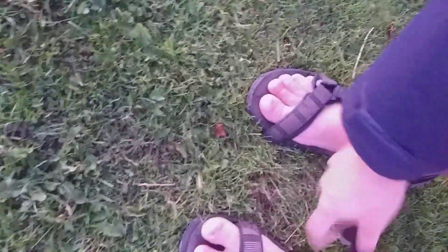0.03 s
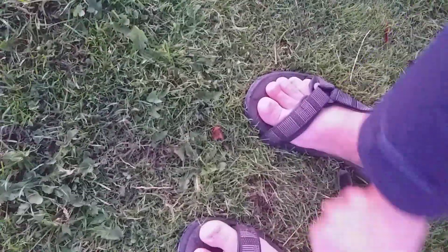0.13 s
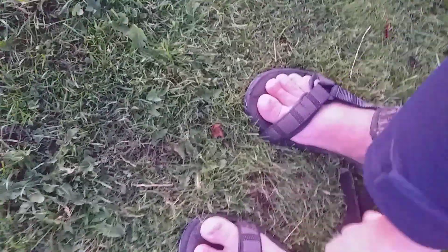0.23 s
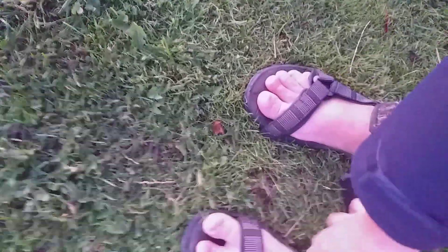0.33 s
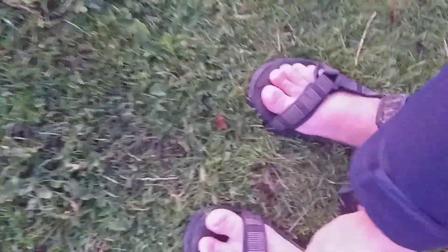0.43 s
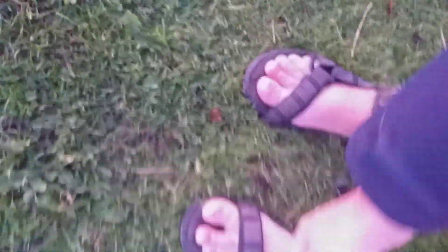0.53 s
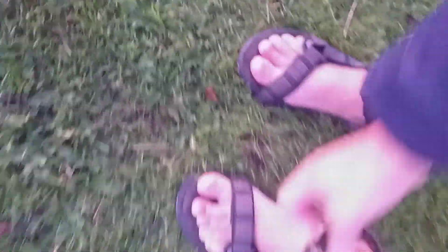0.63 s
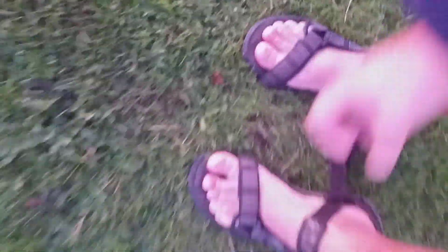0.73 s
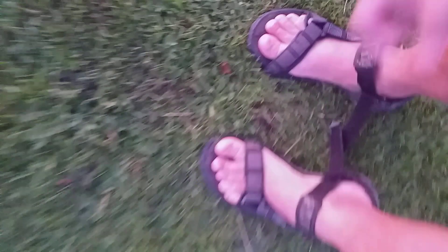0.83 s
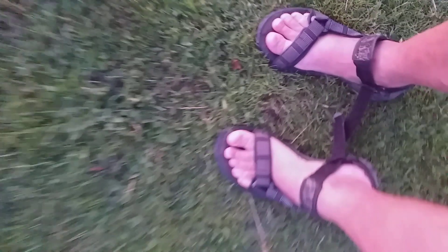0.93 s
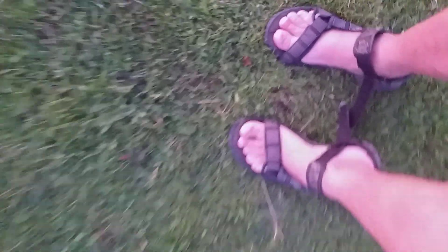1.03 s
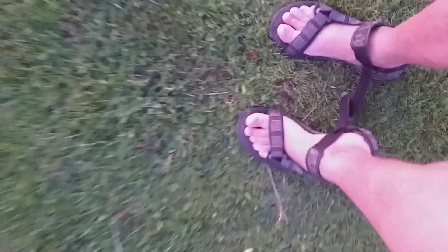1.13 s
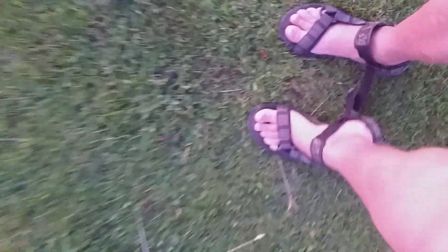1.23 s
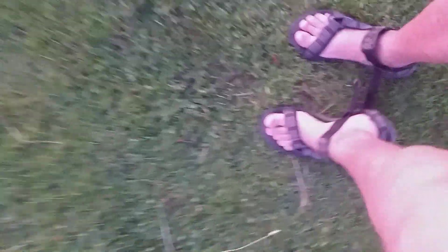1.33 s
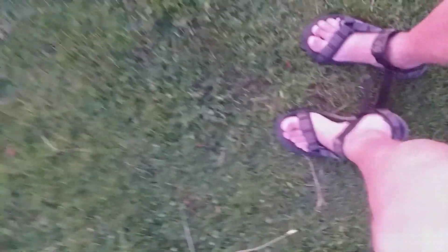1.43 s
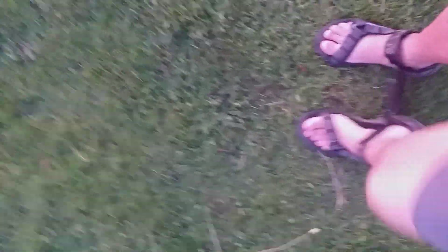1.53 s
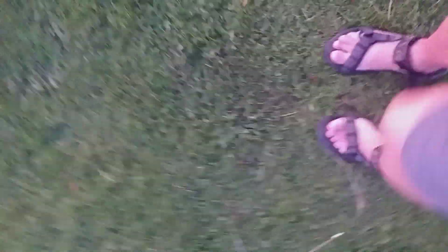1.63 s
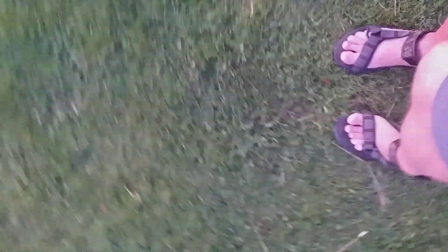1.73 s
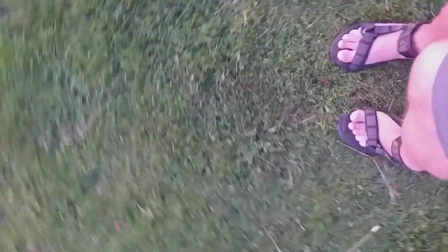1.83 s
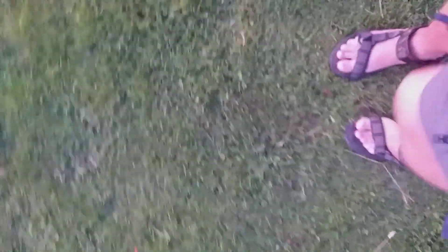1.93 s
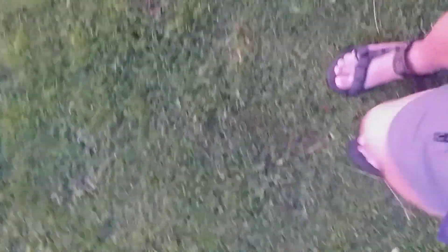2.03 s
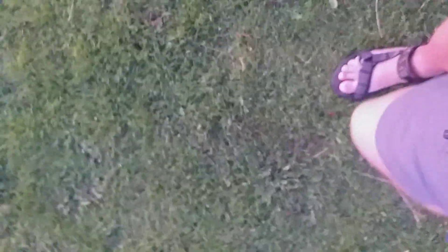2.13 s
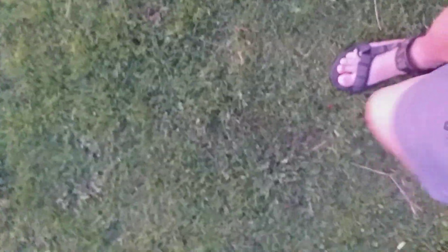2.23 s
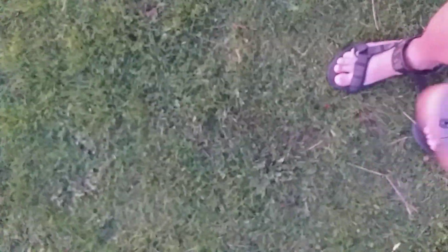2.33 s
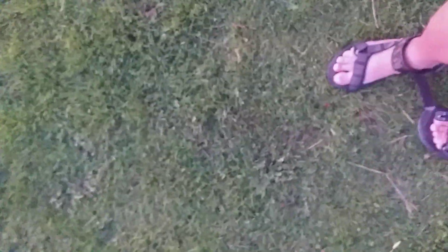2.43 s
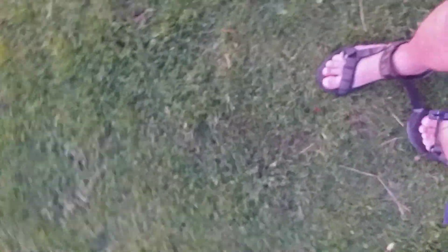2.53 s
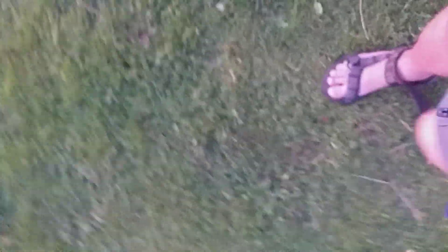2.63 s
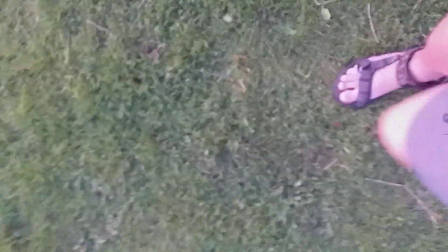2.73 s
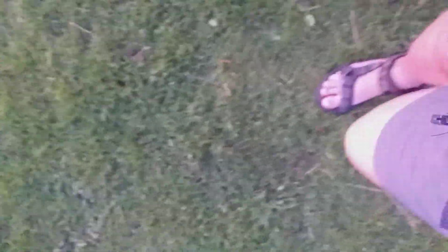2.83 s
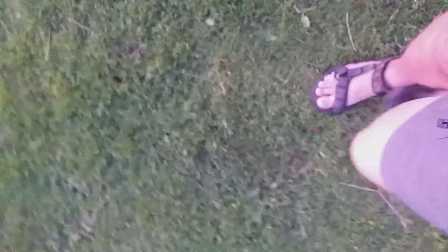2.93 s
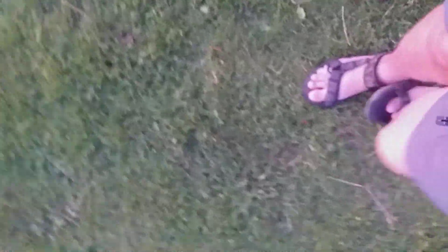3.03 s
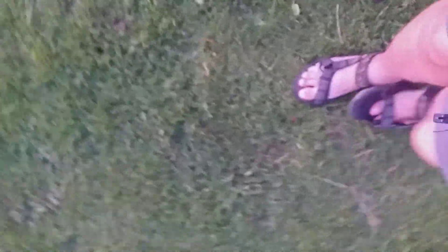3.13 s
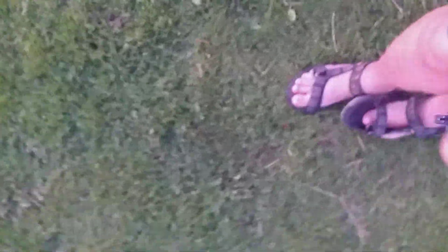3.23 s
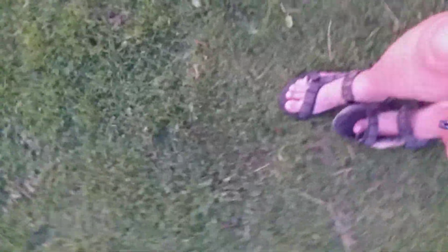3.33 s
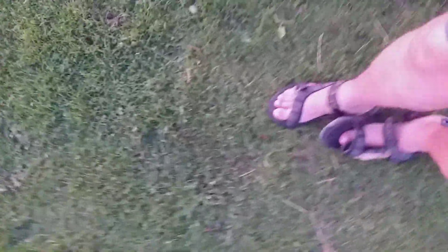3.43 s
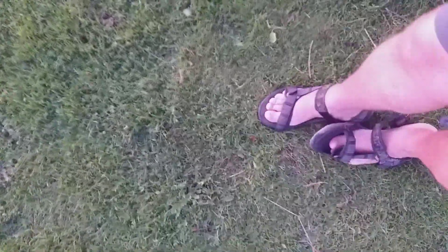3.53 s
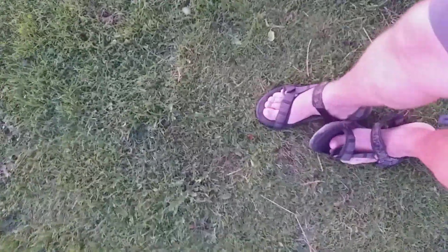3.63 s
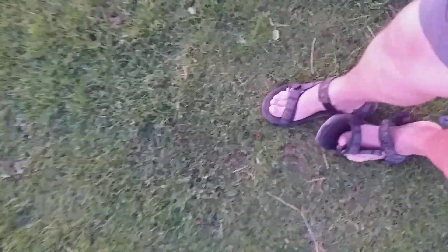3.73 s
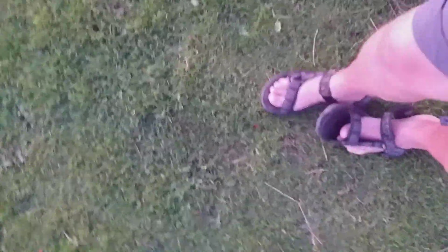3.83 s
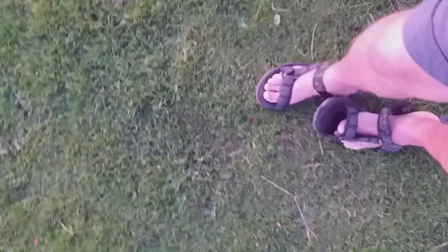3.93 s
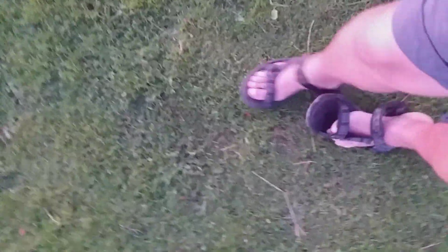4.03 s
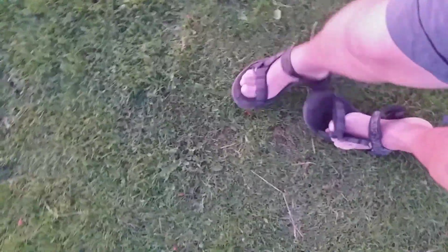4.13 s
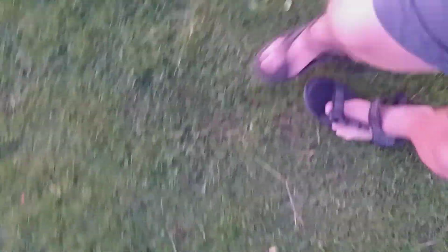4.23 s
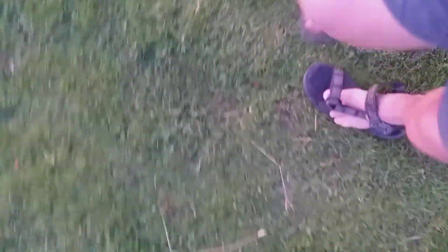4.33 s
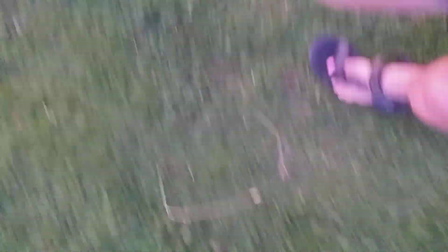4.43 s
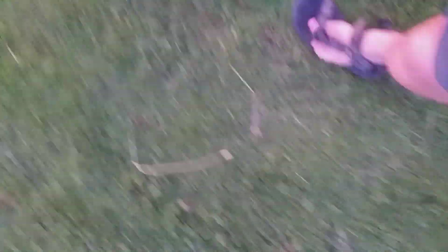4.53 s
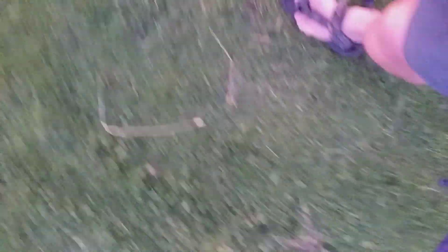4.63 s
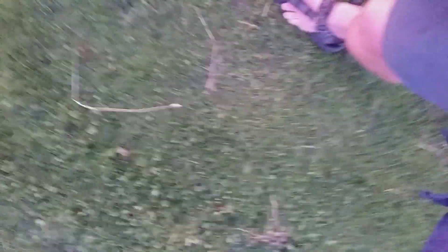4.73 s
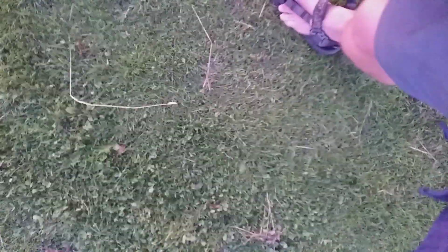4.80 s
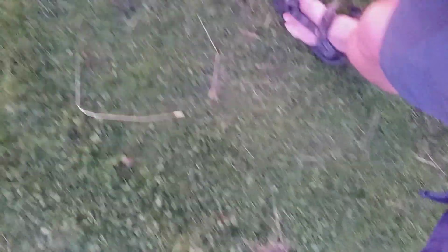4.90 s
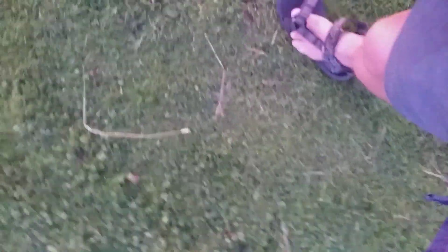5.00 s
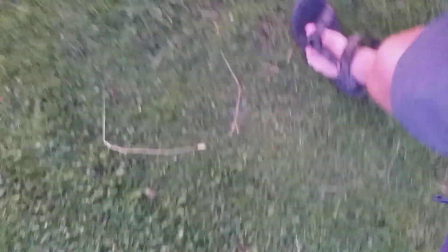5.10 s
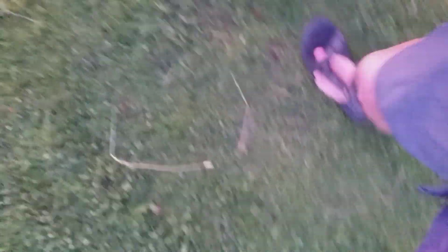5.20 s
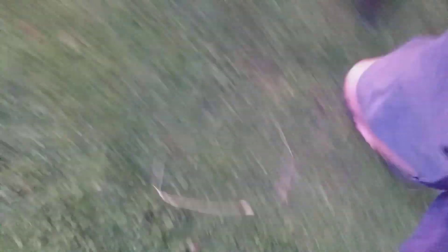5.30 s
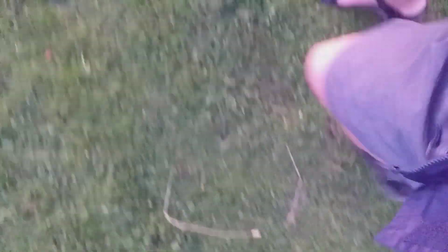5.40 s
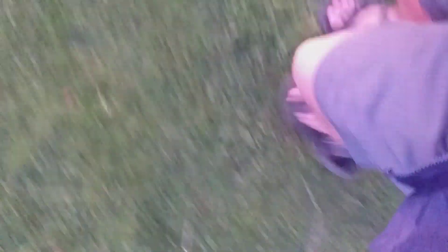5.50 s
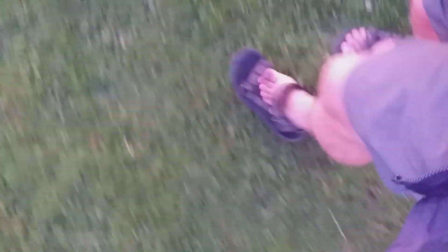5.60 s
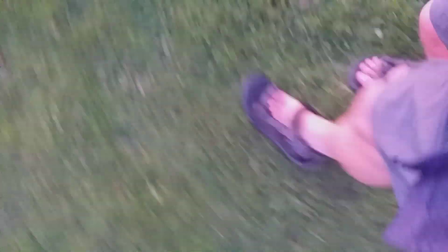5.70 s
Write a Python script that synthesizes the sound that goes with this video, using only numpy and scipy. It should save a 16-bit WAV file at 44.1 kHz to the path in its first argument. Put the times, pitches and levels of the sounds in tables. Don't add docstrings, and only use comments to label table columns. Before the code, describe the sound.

Low gusty wind rumble with fabric rubbing gives way to quiet sandal steps brushing grass, with dry clicks, scrapes and a strap snapping loose.

```python
import sys
import numpy as np
from scipy import signal
from scipy.fft import rfft, irfft
from scipy.io import wavfile
from scipy.ndimage import uniform_filter1d

SR = 44100
rng = np.random.default_rng(int(sys.argv[2]) if len(sys.argv) > 2 else 0)


def put_to_file(sound):
    columns = np.atleast_2d(sound).T
    safe = np.clip(columns, -1, 1)
    whole_steps = np.round(safe * 32767)
    wavfile.write(sys.argv[1], SR, whole_steps.astype(np.int16))


def natural_amplitude(level_db):
    exponent = np.asarray(level_db, float) / 20
    return 10 ** exponent


N = 254016

# [loudest at t/s, level/dB, rise/s per 10 dB, fall/s per 10 dB, weight/dB]
CLOTH = [
    (.02, -52, .1, .05, 8),
    (.08, -49, .08, .3, -8),
    (.3, -46.5, .25, .35, -6),
    (.66, -45.5, .3, .3, 0),
    (.86, -41.5, .25, .17, 1),
    (1.08, -44, .13, .25, -3),
    (1.31, -44.5, .2, .45, 2),
    (1.55, -50, .3, .2, 3),
    (1.81, -43, .15, .09, 1),
    (1.89, -48, .1, .03, 4),
]
# [loudest at t/s, level/dB, rise/s per 10 dB, fall/s per 10 dB, weight/dB]
SWISHES = [(2.04, -50, .1, .05, 1), (2.2, -57, .15, .2, -2), (2.36, -49.5, .1, .13, 0),
           (2.65, -56, .2, .2, 0), (2.78, -49, .15, .06, 0), (2.95, -53.5, .1, .15, -1),
           (3.16, -50.5, .16, .2, -1), (3.39, -54, .2, .15, 2), (3.71, -55.5, .12, .13, -1),
           (3.84, -60.5, .1, .15, -7), (4.13, -59, .15, .2, 3), (4.33, -41.5, .1, .23, 2),
           (4.5, -51.5, .2, .2, 0), (4.66, -52, .15, .05, 1), (4.77, -58, .1, .12, 3),
           (4.83, -55, .07, .06, -2), (4.94, -48, .03, .13, -4), (5.1, -49.5, .13, .12, -9),
           (5.21, -46, .15, .15, 3), (5.27, -49, .1, .05, -6), (5.37, -50.5, .15, .15, 2),
           (5.45, -51.5, .1, .1, -3), (5.6, -50, .08, .2, -3), (5.76, -48.5, .2, .2, 2)]


def unit(x):
    return x / np.sqrt(np.mean(x ** 2))


def band(x, lo_hz, hi_hz, order=2):
    return signal.sosfilt(signal.butter(order, [lo_hz, min(hi_hz, .45 * SR)], "band", fs=SR, output="sos"), x)


def steady(x, span):
    k = int(span * SR)
    power = uniform_filter1d(uniform_filter1d(x ** 2, k), k)
    return unit(x / np.sqrt(power + 1e-9))


def walk(rate):
    k = int(SR / rate)
    held = np.repeat(rng.standard_normal(N // k + 1), k)
    return unit(uniform_filter1d(held, k)[:N])


def grains(rate, spread_db):
    struck = rng.random(N) < rate / SR
    sign = np.sign(rng.standard_normal(N))
    size_db = spread_db * np.minimum(rng.exponential(size=N), 3)
    return unit(struck * sign * natural_amplitude(size_db))


def add(out, s, x):
    i = int(s * SR)
    out[i:i + len(x)] += x[:N - i]


def swells(rows, under_db):
    t, power = np.arange(0, N, 64) / SR, 0
    for s, db, rise, fall in rows:
        away = np.maximum((s - t) / rise, (t - s) / fall) ** 1.5
        power = power + natural_amplitude(2 * db - 20 * away)
    return 10 * np.log10(np.interp(np.arange(N) / SR, t, power) + natural_amplitude(2 * under_db))


def motion(table, offset_db, slope):
    return [(s, db + offset_db + slope * weight, rise, fall) for s, db, rise, fall, weight in table]


def ring(hz, cycles, fall):
    turn = np.arange(int(6 * cycles * SR / hz)) * hz / SR
    shape = turn / cycles * np.exp(-2 * turn / cycles)
    x = shape * np.sin(2 * np.pi * np.log1p(fall * turn) / fall)
    return x / np.abs(x).max()


def swirl(hz, cycles, lean):
    turn = np.arange(-2048, 2048) * hz / SR
    shape = np.exp(-np.log(16) * (turn / cycles) ** 2)
    return shape * np.cos(2 * np.pi * (turn - .06 * turn ** 2 / cycles) + lean)


def crack():
    burst = rng.standard_normal(128) * np.exp(-np.arange(128) / 18.0)
    burst[0] += 4.0 * np.sign(burst[0])
    return burst / np.sqrt(np.sum(burst ** 2))


def wind():
    # [t/s, strength/dB, bite of the small eddies/dB]
    gusts = [(0, -50, 0), (.09, -37, -1), (.42, -37, 0), (.55, -43, -4), (.68, -35, -1), (1.22, -36, 3),
             (1.3, -44, -6), (1.42, -46, -6), (1.48, -34, -8), (1.8, -36, -5), (1.94, -28, -2),
             (1.98, -45, -4), (2.07, -34, -7), (2.42, -47, -7), (2.47, -64, -5), (4.15, -59, -8),
             (4.3, -57, 0), (5.76, -60, -2)]
    # [strongest at t/s, peak level/dB, f/Hz, cycles at half height]
    thumps = [(0.065, -24.4, 182, 1.51), (0.085, -25.0, 110, 1.37), (0.128, -27.0, 118, 0.79),
              (0.154, -30.6, 147, 0.61), (0.165, -20.3, 145, 0.71), (0.184, -16.0, 129, 0.95),
              (0.202, -17.2, 96, 0.93), (0.226, -21.8, 89, 0.75), (0.253, -10.5, 171, 1.21),
              (0.279, -17.9, 139, 1.58), (0.319, -13.5, 200, 1.5), (0.331, -15, 115, 1.1),
              (0.37, -17.0, 117, 1.38), (0.402, -26.4, 143, 0.65), (0.438, -20.1, 128, 0.74),
              (0.65, -25.9, 128, 0.86), (0.686, -14.9, 120, 2.04), (0.703, -19.0, 147, 0.86),
              (0.723, -19.0, 174, 0.89), (0.778, -18.2, 121, 0.96), (0.811, -25.2, 116, 1.86),
              (0.836, -13.2, 203, 0.99), (0.879, -19.2, 125, 1.61), (0.908, -14.3, 124, 1.18),
              (0.926, -21.0, 106, 1.02), (0.966, -25.7, 89, 1.44), (0.981, -23.5, 140, 0.71),
              (0.997, -25.2, 122, 0.79), (1.019, -22.8, 127, 1.38), (1.066, -20.7, 172, 1.32),
              (1.077, -23.3, 111, 0.6), (1.121, -26.4, 139, 1.01), (1.134, -18.3, 149, 1.44),
              (1.189, -22.8, 180, 2.87), (1.214, -23.4, 197, 0.94), (1.474, -28.5, 112, 0.92),
              (1.508, -26.5, 110, 1.82), (1.612, -28.4, 113, 2.18), (1.653, -24.9, 110, 1.72),
              (1.783, -27.0, 86, 0.95), (1.866, -20.9, 123, 0.84), (1.901, -12.6, 188, 1.06),
              (1.922, -11.5, 129, 0.92), (2.048, -25.3, 124, 0.73), (2.079, -24.9, 91, 1.49),
              (2.123, -28.2, 109, 0.93), (2.143, -23.4, 133, 1.43), (2.165, -25.8, 137, 0.79),
              (2.255, -28.1, 123, 2.73), (2.32, -27.9, 114, 1.2)]
    # [t/s, peak level/dB, f/Hz, cycles]
    lesser = [(.585, -33, 170, 1.2), (.625, -30, 120, 1.2), (1.035, -30, 110, 1.5), (1.095, -30, 120, 1.5),
              (1.25, -33, 120, 1.5), (4.3, -41, 120, 1.5), (4.34, -42, 90, 1.5), (1.357, -35, 143, 1.5),
              (2.36, -36, 100, 1.5), (2.403, -38, 78, 1.5), (5.26, -46, 95, 1.5), (5.36, -42, 170, 1.5),
              (5.395, -42, 250, 1.5), (5.425, -44, 110, 2)]
    # [t/s, peak level/dB]
    puffs = [
        (2.608, -38),
        (2.68, -38),
        (3.47, -44),
        (3.529, -42),
        (3.76, -47),
        (3.866, -43),
        (3.92, -45),
        (3.979, -43),
        (4.08, -39.5),
        (4.8, -45),
    ]
    # [t/s, peak level/dB, f/Hz, cycles]
    footfall = (4.382, -30, 145, 1.3)
    t, strength_db, bite_db = np.transpose(gusts)
    strength_db, bite_db = (np.interp(np.arange(N) / SR, t, c) for c in (strength_db, bite_db))
    soft = lesser + [(s, db, 82, 1.7) for s, db in puffs] + [footfall]
    out = turbulence(thumps + soft, strength_db, bite_db)
    for s, db, hz, cycles in thumps:
        sign = np.sign(rng.standard_normal())
        add(out, s - 2048 / SR, sign * natural_amplitude(db - .7) * swirl(hz, cycles, rng.uniform(-.8, .8)))
    for s, db, hz, cycles in soft:
        sign = np.sign(rng.standard_normal())
        add(out, s, sign * natural_amplitude(db - 2.0) * ring(1.16 * hz, cycles, fall=0.14))
    return out + edges_and_heaves() + flicks()


def turbulence(jumps, strength_db, bite_db):
    def wake(levels, under_db):
        return [(row[0], db + under_db, .016, .02) for row, db in zip(jumps, levels)]

    peaks_db = [db for s, db, hz, cycles in jumps]
    edges_db = [db - 12 - 6 * cycles + bite_db[int(s * SR)] for s, db, hz, cycles in jumps]
    middle_rows = wake(peaks_db, -17) + motion(SWISHES, -8.5, .8)
    small_rows = wake(edges_db, -12) + motion(SWISHES, -2.5, 1.1) + motion(CLOTH, -5.5, 0)
    big_db = swells(wake(peaks_db, -17), strength_db)
    middle_db = swells(middle_rows, -47.5 + 1.0 * (strength_db + 40))
    small_db = swells(small_rows, -64 + .6 * (strength_db + 40) + bite_db)

    lumpy = np.clip((middle_db + 57) / 18, 0, 1)
    lumps = grains(300, 4.4) * natural_amplitude(6.2 * walk(30))
    eddies = lumpy * lumps + (1 - 0.75 * lumpy) * rng.standard_normal(N)
    big = natural_amplitude(big_db - 1.5) * steady(band(band(eddies, 20, 200), 56, 125), .06)
    middle = steady(band(band(eddies, 20, 330, order=3), 100, 280), .06)
    upper = band(middle, 175, 600)
    middle = natural_amplitude(middle_db - 2.5) * (band(middle, 20, 170) - natural_amplitude(bite_db - 3.5) * upper) * .95
    small = natural_amplitude(small_db - 5) * steady(band(band(eddies, 144, 600), 285, 600), 0.11)
    return big + middle + small


def edges_and_heaves():
    # [strongest at t/s, peak level/dB, f/Hz]
    edges = [(0.182, -33.7, 366), (0.193, -26.9, 376), (0.201, -32.6, 317), (0.209, -29.0, 346),
             (0.251, -20.6, 344), (0.272, -31.0, 309), (0.32, -25.9, 382), (0.333, -26.9, 356),
             (0.367, -32.4, 304), (0.438, -32.7, 310), (0.667, -36.1, 395), (0.675, -35.7, 398),
             (0.691, -35.5, 319), (0.702, -33.7, 365), (0.716, -31.8, 334), (0.723, -31.4, 328),
             (0.776, -35.1, 352), (0.801, -37.0, 347), (0.835, -21.4, 333), (0.905, -32.8, 322),
             (0.912, -37.3, 364), (0.929, -38.6, 367), (0.979, -32.4, 332), (1.024, -30.1, 419),
             (1.064, -30.2, 337), (1.122, -28.7, 440), (1.14, -32.9, 330), (1.154, -36.9, 437),
             (1.188, -35.6, 326), (1.215, -35.1, 321), (1.88, -36.2, 327), (1.9, -24.3, 334),
             (1.92, -31.3, 332), (2.048, -38.0, 322)]
    # [strongest at t/s, peak level/dB, f/Hz]
    heaves = [(0.088, -32.8, 80), (0.198, -22.1, 68), (0.266, -29.2, 80), (0.328, -22.4, 79),
              (0.376, -26.2, 69), (0.439, -26.9, 75), (0.64, -31.8, 83), (0.697, -25.4, 75),
              (0.743, -28.5, 76), (0.786, -29.0, 74), (0.917, -23.2, 73), (0.965, -27.6, 79),
              (1.135, -31.6, 73), (1.205, -29.0, 74), (1.616, -33.5, 74), (1.783, -30.7, 72),
              (1.872, -28.7, 79), (1.927, -21.6, 74), (2.048, -32.5, 79), (2.082, -29.4, 76),
              (2.153, -32.8, 68), (2.332, -31.9, 76)]
    out = np.zeros(N)
    for table, cycles, gain_db in (edges, 1.05, 1.2), (heaves, 2.1, -2.5):
        for s, db, hz in table:
            lean = rng.uniform(-np.pi, np.pi)
            add(out, s - 2048 / SR, natural_amplitude(db + gain_db) * swirl(hz, cycles, lean))
    return out


def flicks():
    # [t/s, peak level/dB, f/Hz]
    table = [(.205, -35, 650), (.249, -31, 600), (.28, -36, 480), (.06, -36, 330), (.628, -40, 550),
             (.705, -39, 600), (1.898, -34, 550), (.317, -32, 650), (.833, -33, 600), (1.455, -38, 400),
             (4.308, -31, 450), (4.321, -29, 600), (4.385, -26, 500), (4.399, -31, 380), (4.416, -32, 400),
             (4.482, -37, 700)]
    out = np.zeros(N)
    for s, db, hz in table:
        add(out, s, natural_amplitude(db) * ring(hz, .8, fall=0.15))
    return out


def rustle():
    still_db = -66
    heavy_rows = motion(CLOTH, -6, .7) + motion(SWISHES, -1.5, .7)
    fine_rows = motion(CLOTH, -3.5, -.4) + motion(SWISHES, -6.5, -.4)
    middle_db = swells(motion(CLOTH + SWISHES, 0, 0), still_db)
    heavy_db = swells(heavy_rows, still_db + 3)
    fine_db = swells(fine_rows, still_db - 7)
    shared = grains(500, 3.4)

    def blades():
        return colour(rng.standard_normal(N) + natural_amplitude(-7.5) * shared + natural_amplitude(-8.5) * grains(600, 6.3))

    heavy = unit(band(blades(), 533, 2040, order=3)) * natural_amplitude(heavy_db - 0.94 + 1.3 * walk(40))
    middle = unit(band(blades(), 2110, 10060, order=4)) * natural_amplitude(middle_db + 0.16 + 0.52 * walk(40))
    fine = unit(band(blades(), 9030, 20500, order=4)) * natural_amplitude(fine_db + 3.0 + 0.38 * walk(40))
    patches = natural_amplitude(0.69 * steady(walk(60), 0.087))
    return patches * (heavy + middle + fine)


def colour(x):
    # [f/Hz, level/dB per Hz]
    curve = [(320, -11), (550, 4.5), (849, 3.5), (910, 2.5), (990, 4.5), (1910, 3), (2260, -3), (2670, 1),
             (3490, 0), (4190, 3), (5020, -1), (7530, -3), (9290, -18.5), (11100, -14), (15600, -13)]
    hz, colour_db = np.transpose(curve)
    grid = np.log(np.arange(N // 2 + 1) * SR / N + 1)
    return irfft(rfft(x) * natural_amplitude(np.interp(grid, np.log(hz), colour_db)), N)


def shade(x):
    # [deepest at t/s, rise/s per 10 dB, fall/s per 10 dB, f/Hz]
    hollows = [
        (2.13, .06, .05, 2600),
        (2.2, .1, .12, 2200),
        (2.43, .06, .08, 2450),
        (3.58, .08, .06, 2550),
        (3.98, .1, .12, 2400),
        (4.22, .04, .04, 2300),
        (4.74, .04, .1, 2000),
        (4.86, .1, .08, 2150),
        (5.53, .08, .06, 2300),
    ]
    for s, rise, fall, hz in hollows:
        depth = natural_amplitude(swells([(s, -3.5, rise, fall)], -80))
        x = x - depth * band(x, hz / 1.2, hz * 1.2, order=1)
    return x


def clicks():
    # [t/s, peak level/dB, f/Hz, cycles]
    knocks = [(.23, -31, 1670, 1.8), (.373, -35, 1770, 1.5), (.41, -31, 2200, .45), (.678, -26, 2800, 1.5),
              (.955, -22, 1800, 1), (1.511, -29, 2600, .5), (.011, -36, 2000, .5), (2.053, -20, 1900, .6),
              (2.061, -31, 1570, .58), (2.433, -33, 1200, .7), (2.809, -33, 824, .63),
              (3.332, -39, 850, .84), (.187, -30, 3000, .5), (3.663, -41, 3930, 1.5),
              (3.909, -44, 3500, 1.6), (4.061, -31, 1040, 1.1), (4.098, -33.5, 680, .77),
              (4.119, -38, 800, .8), (4.1266, -22.5, 3900, .9), (4.127, -38, 1900, 1.5),
              (4.165, -39, 670, .9), (4.1825, -24, 1400, 1.5), (4.675, -31, 1000, .5),
              (4.688, -40, 1300, .8), (4.695, -39, 1000, .7), (4.9, -43, 450, 1), (5.282, -38, 1000, 1),
              (5.58, -41, 550, 1), (2.01, -39, 1960, 1.5), (1.02, -33, 2200, .6), (.006, -33, 1400, 1),
              (4.924, -35, 1950, 2), (5.061, -38, 1160, 1.3), (5.215, -25, 4100, .7), (5.359, -30, 3600, 1),
              (5.596, -27, 1950, 2)]
    # [t/s, bright level/dB, bright f/Hz, thin level/dB]
    cracks = [(.011, -35, 7000, -47), (.187, -32, 4500, -43), (.23, -44, 6000, -48), (.267, -36, 5600, -29),
              (.284, -38, 4500, -42), (.326, -36, 5200, -43), (.35, -35, 6500, -34), (.377, -46, 6000, -39),
              (.393, -50, 6000, -32), (.425, -48, 6000, -38), (.678, -38, 3940, -45),
              (1.296, -42, 4200, -32), (1.462, -42, 5500, -55), (1.511, -31, 3800, -42),
              (1.874, -52, 6000, -29), (1.897, -31, 7600, -50), (2.026, -42, 4200, -55),
              (3.436, -58, 6000, -49), (3.456, -56, 6000, -49), (3.469, -60, 6000, -53),
              (3.515, -47, 6500, -50), (3.603, -47, 3700, -62), (3.637, -45, 7000, -59),
              (4.061, -50, 4200, -60), (4.098, -48, 3900, -55), (4.119, -47, 4000, -43),
              (4.1265, -33, 6500, -43), (4.15, -48, 7500, -50), (4.197, -39, 6000, -55),
              (4.213, -46, 6500, -52), (4.703, -39, 3200, -60), (4.924, -36, 4500, -55),
              (4.929, -29, 8000, -48), (4.94, -35, 3800, -48), (4.944, -35, 8200, -50),
              (5.061, -53, 5500, -48), (5.216, -42, 6000, -45), (5.345, -40, 4000, -55),
              (5.6, -44, 4000, -55)]
    out, thin = np.zeros((2, N))
    for s, db, hz, cycles in knocks:
        cycles = cycles * max(hz / 1000, 1) ** 0.33
        add(out, s + .0008, natural_amplitude(db - 1) * ring(hz, cycles, fall=0.048))
    for s, bright_db, hz, thin_db in cracks:
        add(out, s + .0006, natural_amplitude(bright_db + 21) * band(crack(), hz / 1.45, hz * 1.45))
        add(thin, s + 0.0008, natural_amplitude(thin_db + 22) * crack())
    port = signal.butter(2, [8500, 10800], "bandstop", fs=SR, output="sos")
    return signal.sosfilt(port, out) + band(thin, 12800, 17000, order=3)


def snap():
    # [delay/s, peak level/dB, f/Hz, cycles]
    parts = [
        (.00052, -16.5, 837, 1.05),
        (.00035, -25, 3750, 3.2),
        (.00062, -17.8, 1180, .88),
        (.0015, -24, 330, .36),
        (0, -26.5, 1860, 3.3),
        (.0004, -29, 7200, 3.5),
        (.0005, -34, 5700, 4.),
        (.0004, -27, 12200, 3.5),
        (.0004, -24, 15200, 5.),
    ]
    start_s = 3.4078
    out = np.zeros(N)
    add(out, start_s + .0003, natural_amplitude(-32) * crack())
    out = band(out, 5200, 8200) * natural_amplitude(16)
    for delay, db, hz, cycles in parts:
        turn = np.arange(512) * hz / SR
        shape = turn / cycles * np.exp(-(turn / cycles) ** 2)
        add(out, start_s + delay, natural_amplitude(db + 7) * shape * np.sin(2 * np.pi * turn))
    return out


def scrapes():
    # [t/s, peak level/dB, f/Hz, length/s]
    table = [(0.696, -40, 931, 0.0045), (4.09, -36, 4050, 0.0025), (4.139, -39, 4300, 0.0054),
             (4.149, -37, 3850, 0.003), (4.052, -47, 3500, 0.004), (5.34, -39, 4000, 0.008),
             (5.357, -33, 2100, 0.004), (5.18, -35, 2970, 0.0054), (5.212, -32.5, 4060, 0.005),
             (5.343, -32, 1950, 0.004), (5.356, -37, 4200, 0.0086), (5.366, -33.5, 1750, 0.0043),
             (5.437, -35, 2720, 0.004), (5.438, -39, 3400, 0.004), (5.445, -39, 2800, 0.004),
             (5.592, -36, 1940, 0.005), (5.603, -37, 2100, 0.005)]
    out = np.zeros(N)
    for s, db, hz, length in table:
        t = np.arange(2048) / SR / length
        slips = band(rng.standard_normal(2048), .88 * hz, 1.13 * hz)
        add(out, s, natural_amplitude(db + 0.5) * unit(slips) * t * np.exp(-t ** 2))
    return out


def rubs():
    # [loudest at t/s, level/dB, rise/s per 10 dB, fall/s per 10 dB, f/Hz]
    table = [(.85, -49, .025, .025, 1100), (4.8, -58, .1, .08, 330), (1.82, -49, .06, .06, 5200),
             (1.88, -50, .04, .03, 1000), (1.91, -52, .03, .02, 4700), (2.36, -58, .06, .05, 4100),
             (2.53, -62, .05, .06, 1600), (3.43, -58, .03, .05, 1400), (3.72, -61, .06, .05, 4000),
             (4.28, -52, .03, .04, 1200), (4.78, -55, .08, .1, 1330), (4.82, -62, .03, .03, 4000),
             (5.21, -54, .05, .05, 1800), (5.25, -55, .04, .05, 4300)]
    slips = rng.standard_normal(N) + .6 * grains(900, 4.0)
    out = np.zeros(N)
    for *row, hz in table:
        out += natural_amplitude(swells([row], -120)) * unit(band(slips, hz / 1.22, hz * 1.22))
    return out


def hush():
    return natural_amplitude(-77) * unit(band(rng.standard_normal(N), 90, 190, order=2))


def flutters():
    # [t/s, low f/Hz, high f/Hz, level/dB]
    table = [
        (.6, 4700, 9000, -49),
        (2.35, 5700, 7000, -64),
        (5.02, 12400, 14500, -63),
        (5.67, 14400, 15800, -65),
    ]
    out = np.zeros(N)
    for s, lo_hz, hi_hz, db in table:
        hiss = unit(band(rng.standard_normal(3000), lo_hz, hi_hz, order=4))
        add(out, s - .03, natural_amplitude(db) * np.hanning(3000) * hiss)
    return out


def scene():
    mono = wind() + shade(rustle()) + clicks() + snap() + scrapes() + rubs() + hush()
    side = flutters()
    return np.array([mono + side, mono - side])


def low_pass(x):
    return signal.sosfilt(signal.butter(12, 17040, fs=SR, output="sos"), x)


def record(dry):
    cut = signal.sosfilt(signal.butter(4, 48, "high", fs=SR, output="sos"), dry)
    cut = signal.sosfiltfilt(signal.ellip(8, .15, 35, 15830, fs=SR, output="sos"), cut)
    return low_pass(cut)


dry = scene()
out = record(dry)
put_to_file(out)
```